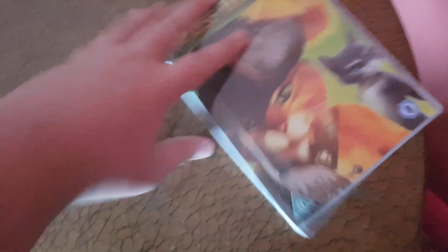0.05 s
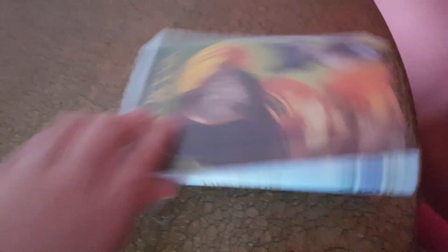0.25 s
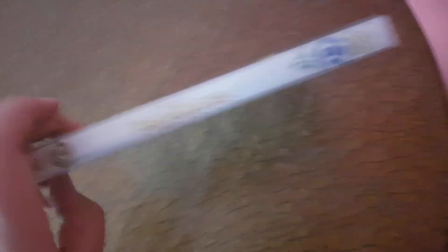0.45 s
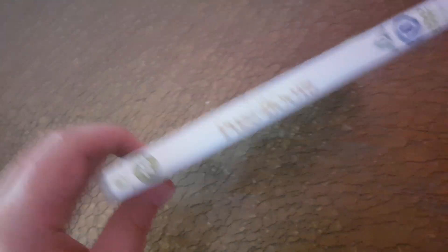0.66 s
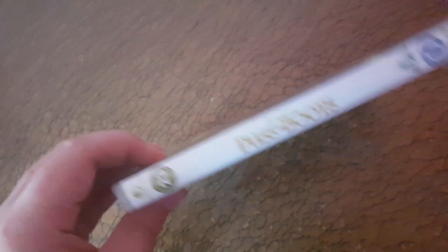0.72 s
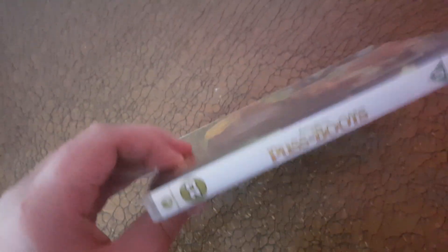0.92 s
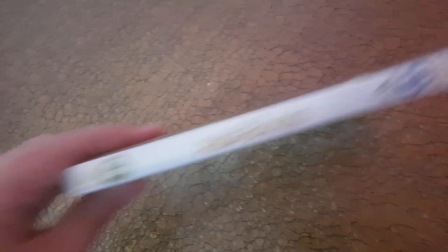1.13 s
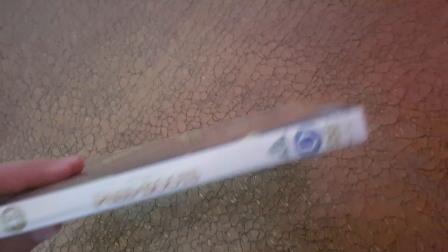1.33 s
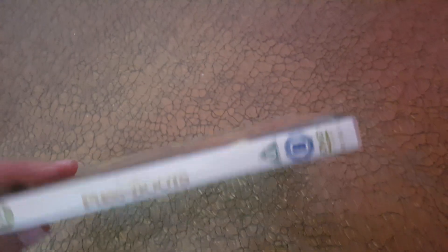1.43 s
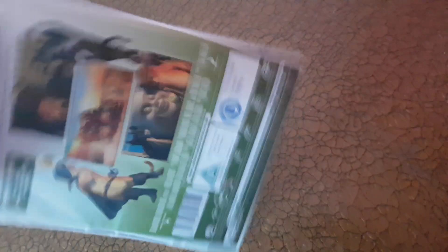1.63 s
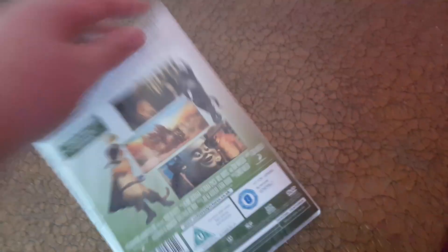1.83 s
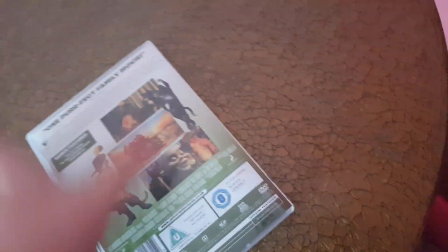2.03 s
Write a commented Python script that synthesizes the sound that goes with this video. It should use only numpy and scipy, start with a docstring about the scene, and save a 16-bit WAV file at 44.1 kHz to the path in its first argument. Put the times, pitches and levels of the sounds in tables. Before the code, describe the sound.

A plastic disc case is handled on a table, close up in a small, lively room. A soft knock and low thump at 0.03 s lead into scraping and light clicks. Sharp hollow knocks land around 0.5 and 0.7 s. After a quieter gap, fingers rub and slide from 1.1 to 1.6 s with faint ticks. At 1.77 s the lid clicks, then the case slaps down near 1.9 s, rattling and scraping.

```python
"""Knocks, clicks and scraping of a plastic disc case handled on a table in a small, bare room, close by.
A hand lands on it, drags it and stands it on its edge with two knocks, slides along it,
then tips it over: the loose lid clicks and the case slaps down flat, the disc rattling inside.
Impacts are short force pulses that excite decaying modes and a diffuse room tail; friction is
coloured noise with a moving level, and the swinging case adds low swells over a steady room tone."""
import sys
import numpy as np
from scipy import signal
from scipy.fft import rfft, irfft, next_fast_len
from scipy.io import wavfile
from scipy.ndimage import uniform_filter1d

SR = 44100
rng = np.random.default_rng(int(sys.argv[2]) if len(sys.argv) > 2 else 0)


def master_out(mix):
    """Clip the mix to full scale and print it as 16-bit PCM to the path in sys.argv[1]."""
    frames = np.transpose(np.atleast_2d(mix))
    ceiling = np.clip(frames, -1, 1)
    pcm = np.round(ceiling * 32767).astype(np.int16)
    wavfile.write(sys.argv[1], SR, pcm)


N = 91331
T = np.arange(SR // 2) / SR  # time axis of one event, s
HZ = np.fft.rfftfreq(2 * len(T), 1 / SR)  # frequency axis of a pulse

# likeness of the two ears: frequency_hz, correlation (0 to 1)
LIKENESS = [(100, 0.88), (300, 0.9), (600, 0.89), (1200, 0.33), (3000, 0.055), (12000, 0.022)]
# broad spectrum of plastic on plastic: frequency_hz, level_db
CLACK_SPECTRUM = [(200, -31), (700, -3.5), (1100, -2), (1400, -1), (1750, -3), (2100, -5), (2700, -3.5),
                  (3400, -9), (4400, -7), (5500, -13.5), (7000, -26), (16000, -57)]
RUB_ROOM_DB = -3.5  # room tail relative to the direct rubbing sound


def amp(db):
    """Decibels express the logarithm of an amplitude ratio."""
    return 10 ** (np.asarray(db) / 20)


def unit(x):
    """Normalization to an RMS of one separates level from waveform."""
    return x / np.sqrt(np.mean(x ** 2) + 1e-20)


def unit_energy(x):
    """Normalization to unit energy per channel makes responses of different decay comparable."""
    return unit(x) / np.sqrt(x.shape[-1])


def along(points, hz):
    """Interpolation on a log-frequency axis, from points of frequency_hz and value."""
    f, v = np.transpose(points)
    return np.interp(np.log(hz + 1), np.log(f + 1), v)


def filtered(x, response):
    """Linear filtering: the spectrum of x is multiplied by a response of frequency."""
    n = x.shape[-1]
    padded = next_fast_len(n + SR // 4)
    spectrum = rfft(x, padded) * response(np.fft.rfftfreq(padded, 1 / SR))
    return irfft(spectrum, padded)[..., :n]


def coloured(x, points):
    """Spectral shaping by a zero-phase gain curve of frequency_hz and level_db."""
    return filtered(x, lambda hz: amp(along(points, hz)))


def convolve(a, b):
    """Superposition: each sample of one signal launches a copy of the other."""
    return signal.fftconvolve(np.atleast_2d(a), np.atleast_2d(b), axes=1)


def add(track, s, x):
    """Superposition of x on the track from time s."""
    i = round(s * SR)
    track[:, i:i + x.shape[1]] += x[:, :N - i]


def ear_angle(hz):
    """Interaural correlation as an angle: the cosine of twice the angle is the likeness."""
    return np.arccos(np.clip(along(LIKENESS, hz), -1, 1)) / 2


def spread(pair):
    """Interaural coherence: two unrelated signals become ears alike in the bass, apart in the treble."""
    def mid_side_gains(hz):
        return np.array([np.cos(ear_angle(hz)), np.sin(ear_angle(hz))])

    mid, side = filtered(pair, mid_side_gains)
    return np.array([mid + side, mid - side])


def noise(size):
    """Gaussian noise with the interaural coherence of a diffuse sound."""
    return spread(rng.standard_normal((2, size)))


def pulse(gain):
    """Minimum phase: folding the cepstrum gives a causal pulse with the given gain at each of HZ."""
    cepstrum = irfft(np.log(gain + 1e-6))[:len(T)]
    cepstrum[1:] *= 2
    return irfft(np.exp(rfft(cepstrum, 2 * len(T))))[:len(T) // 8]


def ring(modes, scatter_db):
    """Modal decay: exponentially damped cosines, with random level scatter and a phase offset between ears."""
    out = np.zeros((2, len(T)))
    for hz, db, t60 in modes:
        phase = ear_angle(hz) * rng.choice([-1, 1])
        wave = np.cos(2 * np.pi * hz * T + np.array([[phase], [-phase]])) * amp(-60 * T / t60)
        out += amp(db + scatter_db * rng.normal()) * unit_energy(wave)
    return out


def room_tone():
    """Stationary noise: a steady, quiet background with a fixed spectrum."""
    # background spectrum: frequency_hz, level_db
    tone_spectrum = [(25, -22), (53, -11.5), (100, -17), (160, -21.5), (215, -7.5), (285, -16), (400, -20),
                     (600, -24.5), (1500, -27.5), (5000, -42.5), (8000, -50), (16000, -46)]
    level_db = -57.5  # RMS
    return amp(level_db) * unit(coloured(noise(N), tone_spectrum))


def pushes():
    """Air displacement: low, soft swells from the swinging case, alike at both ears."""
    # swells: start_s, level_db
    push_table = [(0.03, -43.5), (0.23, -57), (0.842, -52)]
    push_hz, peak_s = 48, 0.02  # pitch; time at which the envelope peaks
    swell = T / peak_s * np.exp(1 - T / peak_s)
    wave = swell * np.sin(2 * np.pi * push_hz * T)
    out = np.zeros((2, N))
    for s, db in push_table:
        add(out, s, amp(db) * wave[None])
    return out


def room():
    """Diffuse reverberation: a noise tail that builds up, each frequency dying at its own speed."""
    # reverberation time: frequency_hz, t60_s
    decay_times = [(100, 0.37), (300, 0.29), (1500, 0.48), (5000, 0.51), (13000, 0.44)]
    # tail spectrum: frequency_hz, level_db
    tail_colour = [(50, 6), (170, -2.5), (300, -1.5), (1200, -0.5), (4000, -2.5), (8000, -6), (15000, -2)]
    rise_s = 0.0043
    hz, t, z = signal.stft(noise(len(T)), SR, nperseg=256)
    decay = amp(-60 * t / along(decay_times, hz)[:, None])
    tail = signal.istft(z * decay, SR, nperseg=256)[1][:, :len(T)]
    build_up = 1 - np.exp(-(T / rise_s) ** 2)
    return coloured(unit_energy(tail * build_up), tail_colour)


def rubbing(level_db, spectrum):
    """Stick-slip friction: tiny random slips, clumped in time, without the shell's ringing modes."""
    slips_per_s, roughness_db = 3500, 1.9  # mean slip rate; RMS level variation
    slips = rng.standard_normal((2, N)) * (rng.random(N) < slips_per_s / SR)
    clumps = amp(roughness_db * unit(uniform_filter1d(rng.standard_normal(N), size=400)))
    direct = unit(coloured(spread(slips) * clumps, spectrum)) * amp(level_db)
    return direct + amp(RUB_ROOM_DB) * convolve(direct[0], room())[:, :N]


def sliding():
    """Sliding friction: the case scrapes over the table and fingers hiss along its sleeve."""
    # level curves before the common trims: time_s, scrape_level_db, hiss_level_db
    level_curves = [(0, -35.5, -59), (.1, -45, -58.5), (.19, -45, -54), (0.258, -42.5, -57),
                    (.345, -45, -47.5), (.44, -41.5, -70), (.52, -41, -73), (.7, -46, -71),
                    (.85, -56.5, -75), (1.055, -67, -105), (1.104, -46, -65), (1.17, -49.5, -61.5),
                    (1.22, -42, -58), (1.265, -44.5, -56), (1.32, -68, -72), (1.41, -69, -68),
                    (1.432, -45.5, -86), (1.48, -60, -66), (1.514, -48.5, -74), (1.565, -49.5, -61.5),
                    (1.61, -66.5, -76), (1.7, -68, -83), (1.761, -40, -89), (2.07, -42, -60)]
    # low, broad scrape spectrum: frequency_hz, level_db
    scrape_spectrum = [(40, -14), (120, -4), (210, -3), (300, 5), (430, -6.5), (850, -1.5), (1600, -1),
                       (2800, -7), (5000, -12.5), (7000, -28.5), (16000, -32.5)]
    # high hiss spectrum: frequency_hz, level_db
    hiss_spectrum = [(2500, 0), (5500, 5), (8000, -3), (12000, -6), (16000, -13.5)]
    scrape_trim_db, hiss_trim_db = -2, 3.5
    s, *levels = np.transpose(level_curves)
    scrape_db, hiss_db = [np.interp(np.arange(N) / SR, s, v) for v in levels]
    scrape = rubbing(scrape_db + scrape_trim_db, scrape_spectrum)
    return scrape + rubbing(hiss_db + hiss_trim_db, hiss_spectrum)


def scuffs():
    """Friction-driven resonance: a brief finger slip swells and sets one resonance of the plastic singing."""
    # slips: middle_s, length_s, scrape_level_db, pitch_hz, resonance_level_db, fizz_level_db
    scuff_table = [(0.139, 0.098, -69, 1920, -52, -43), (0.222, 0.068, -61, 1340, -43, -47),
                   (0.375, 0.023, -68, 850, -43, -64), (0.433, 0.038, -40, 2600, -47, -66.5),
                   (1.076, 0.035, -58, 284, -46, -87), (1.1, 0.08, -66.5, 884, -46.5, -89),
                   (1.106, 0.079, -75, 1674, -47, -86), (1.213, 0.097, -49.5, 370, -52, -73),
                   (1.243, 0.07, -54, 5100, -51.5, -63.5), (1.377, 0.02, -45.5, 2100, -50.5, -81),
                   (1.669, 0.026, -46, 4120, -56.5, -58), (1.72, 0.042, -63, 2090, -62, -58),
                   (1.761, 0.016, -57, 1500, -57, -76)]
    # treble fizz spectrum: frequency_hz, level_db
    fizz_spectrum = [(4000, -16), (8000, -3), (12000, 2.5), (16000, 2)]
    q = 13  # sharpness of the resonance
    out = np.zeros((2, N))
    for middle, length, scrape_db, hz, ring_db, fizz_db in scuff_table:
        swell = np.sin(np.pi * np.minimum(T / length, 1)) ** 2
        slips = noise(len(T))
        # second-order bandpass with unit gain at hz
        singing = filtered(slips, lambda f: 1j * f * hz / (q * (hz ** 2 - f ** 2) + 1j * f * hz))
        scrape = amp(scrape_db) * unit(coloured(slips, CLACK_SPECTRUM))
        fizz = amp(fizz_db) * unit(coloured(slips, fizz_spectrum))
        direct = swell * (scrape + amp(ring_db) * unit(singing) + fizz)
        start = middle - length / 2
        add(out, start, direct)
        add(out, start, amp(RUB_ROOM_DB) * convolve(direct[0], room()))
    return out


def snap():
    """Contact impulse: a single push in the bass, a dense and short noise flutter above it."""
    crossover_hz, flutter_t60_s = 610, 0.031
    low = signal.butter(2, crossover_hz, "low", fs=SR, output="sos")
    high = signal.butter(2, crossover_hz, "high", fs=SR, output="sos")
    flutter = unit_energy(noise(len(T)) * amp(-60 * T / flutter_t60_s))
    push = signal.sosfilt(low, signal.unit_impulse(len(T)))
    return push + signal.sosfilt(high, flutter)


def shell():
    """Modal response: the free case answers a contact with its own modes as well."""
    # modes of the plastic shell: pitch_hz, level_db, t60_s
    shell_modes = [(491, -10, .06), (636, -13, 0.1), (873, -3, 0.022), (1205, -9, 0.041),
                   (1431, 0.5, 0.037), (1606, 0, 0.027), (2014, -3.5, 0.023), (2461, -2.5, 0.043),
                   (3580, -13, 0.01), (4430, -5, 0.034)]
    modes_db = -16  # all modes relative to the contact
    return unit_energy(snap() + amp(modes_db) * ring(shell_modes, scatter_db=2.0))


def clicks():
    """Light impact: lid and disc tap the shell with a broad clack and a ping that depends on the spot."""
    # taps: start_s, level_db, then relative to it ping pitch_hz, ping_level_db, body_level_db, tick_level_db
    click_table = [(0.141, -5, 2320, -7, -12, -19), (0.1988, -0.5, 1390, -7.5, -6, -23),
                   (0.202, -12.5, 4270, -0.5, -16, -31), (0.216, -2.5, 1413, -15, -11, -23.5),
                   (0.367, -10, 884, -4, 6.5, -28), (0.4751, -0.5, 1110, -3.5, 5, -47.5),
                   (0.477, 1.5, 1376, -5.5, -2, -44), (0.497, -9.5, 1600, -5.5, -25, -16),
                   (0.5381, -5, 1510, 5, -21, -16), (0.5517, 7, 2910, -8, 0, -25),
                   (0.563, 2, 1142, -2.5, -1, -26), (1.377, -16.5, 2080, -2.5, -5, -37),
                   (1.4938, -12.5, 1015, -8, -24, -9.5), (1.5855, -17, 4860, -8.5, 8, -16),
                   (1.62, -14.5, 1950, -11, -17, -28), (1.773, 7.5, 3400, -3.5, -11, -17),
                   (1.7742, 6.5, 2047, -4, -16.5, -25), (1.7764, 3.5, 1410, -4.5, -6, -18),
                   (1.7892, 7.5, 1997, -15.5, -4, -23), (1.81, 2, 1810, -20, -23, -25),
                   (1.891, 7.5, 3180, -12.5, -14, -26), (1.894, 1.5, 2360, -13, -14, -32),
                   (1.947, 9, 3700, -13, -8, -24), (1.968, 6, 2380, -14, -10, -18),
                   (1.986, 1.5, 2230, -11.5, 6, -30)]
    # low body spectrum: frequency_hz, level_db
    body_spectrum = [(40, -16.5), (150, -11.5), (600, 4), (1200, -10.5), (3000, -40.5)]
    # bright tick spectrum: frequency_hz, level_db
    tick_spectrum = [(2000, -25), (5000, -13.5), (7000, -6.5), (10500, 0.5), (13000, -8), (16000, -14)]
    room_db = -5
    ping_cycles = 46  # a ping fades by 60 dB in so many cycles
    out = np.zeros((2, N))
    for s, db, hz, ring_db, body_db, tick_db in click_table:
        body = amp(body_db + along(body_spectrum, HZ))
        tick = amp(tick_db + along(tick_spectrum, HZ))
        force = pulse(amp(along(CLACK_SPECTRUM, HZ)) + body + tick)
        add(out, s, amp(db) * convolve(force, shell() + amp(room_db) * room()))
        add(out, s, ring([(hz, db + ring_db, ping_cycles / hz)], scatter_db=0.5))
    return out


def knocks():
    """Heavy impact: the case meets the table, the struck panel rings and the room booms after it."""
    # frequencies at which each blow's force is set: frequency_hz
    force_hz = [170, 420, 700, 1050, 3800, 11000]
    # blows on case and table: start_s, force_level_db at each of the six force_hz, room_level_db,
    # boom_level_db, panel_pitch_hz, panel_ring_level_db, panel_t60_s
    knock_table = [(0.0314, 12, 3.5, 7, -8.5, -12, -21, 4.5, -7, 652, 0.5, 0.12),
                   (0.038, 5.2, 8, 10, 1.5, -2, -23, -2.5, -5, 727, -13.5, 0.14),
                   (0.5314, 19, 20, 9, 18, 16, 13, -6.5, -0.5, 894, 2, 0.062),
                   (0.5342, 8.8, 12, 12.5, 12.5, 3.5, -16, 8, 2.5, 315.4, -7.5, 0.34),
                   (0.6857, 19.3, 18, 14.5, 14.5, 4, -7, -2, -7.5, 247, -3, 0.15),
                   (1.8695, 13, -4, -13, -1.5, -4.5, -8, 1, -25, 2076, -2.5, 0.032),
                   (1.9165, 12.6, 9.5, 24.5, 19, 10, -20, -6, -7.5, 970, 5, 0.095),
                   (1.922, 20, 11.5, 15.5, 12.5, 9, 8, 2, -5.5, 644, -18, .14),
                   (1.9313, 16.6, 16, 14, 10.5, 14, -7.5, 3.5, -4, 146, -6, 0.17)]
    # force spectrum common to all blows: frequency_hz, level_db
    force_colour = [(25, -37), (60, -22), (110, -11), (170, -4), (270, 0.5), (420, 0.5), (700, 2.5),
                    (2400, -1), (4700, -4), (7000, -7), (10500, -9), (16000, -22)]
    # long resonances of table and room: pitch_hz, level_db, t60_s
    boom_modes = [(241.8, -22.5, 0.26), (268.7, -18.5, 0.31), (309, -24.5, 0.55), (462.6, -23.5, 0.29),
                  (983, -28, 0.35), (1132, -17, 0.56), (1470, -19, 0.42)]
    out = np.zeros((2, N))
    for s, *levels, room_db, boom_db, hz, ring_db, t60 in knock_table:
        force_db = along(list(zip(force_hz, levels)), HZ) + along(force_colour, HZ)
        boom = amp(boom_db) * ring(boom_modes, scatter_db=1)
        response = shell() + amp(room_db) * room() + boom
        blow = convolve(pulse(amp(force_db)), response)
        panel = ring([(hz, ring_db, t60)], scatter_db=0)
        add(out, s, blow[:, :len(T)] + panel)
    return out


def scene():
    """Interaural level and time differences place the case; swells and room tone are added unplaced."""
    # level difference of the ears: frequency_hz, left_minus_right_db
    balance = [(100, -1.5), (300, -1), (650, 0.5), (1100, -3.5), (2000, -5), (4500, -3.5), (8000, -1),
               (11000, 3), (14000, -1)]
    left_lead_s = .00008
    sides = np.array([[.5], [-.5]])  # half of each difference goes to each ear

    def placement(hz):
        return amp(along(balance, hz) * sides) * np.exp(2j * np.pi * hz * left_lead_s * sides)

    case = filtered(knocks() + clicks() + scuffs() + sliding(), placement)
    return case + pushes() + room_tone()


def record(dry):
    """Soft saturation and band limiting: the highest peaks are rounded and the top treble removed."""
    ceiling, top_hz = .9, 15950
    rounded = dry / (1 + np.abs(dry / ceiling) ** 4) ** (1 / 4)
    return filtered(rounded, lambda hz: hz < top_hz)


dry = scene()
out = record(dry)
master_out(out)
```